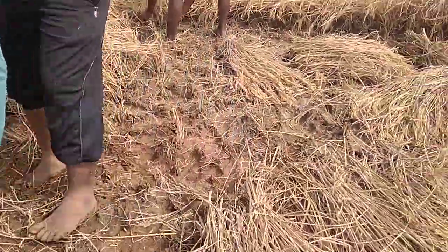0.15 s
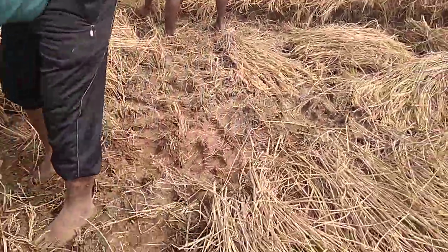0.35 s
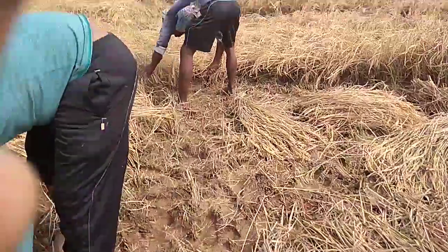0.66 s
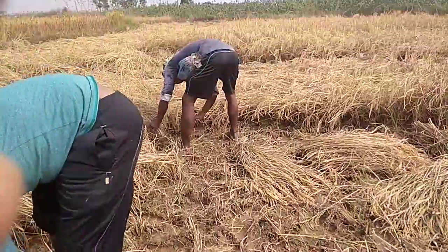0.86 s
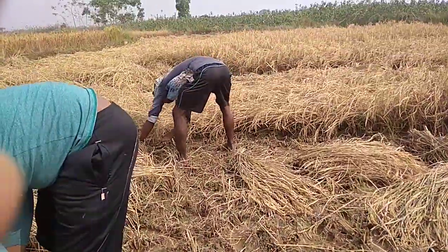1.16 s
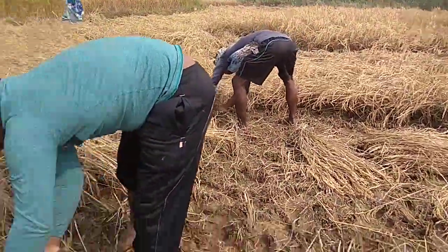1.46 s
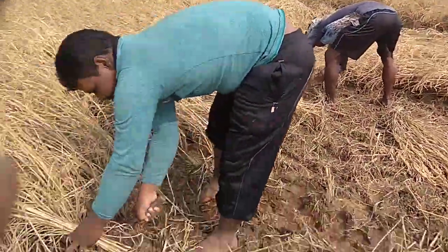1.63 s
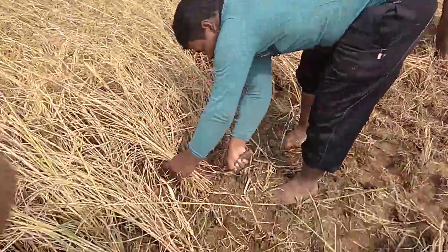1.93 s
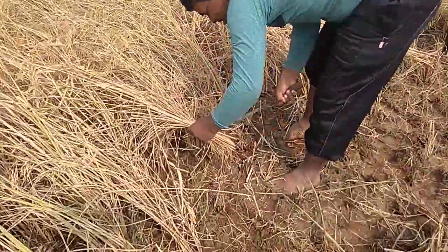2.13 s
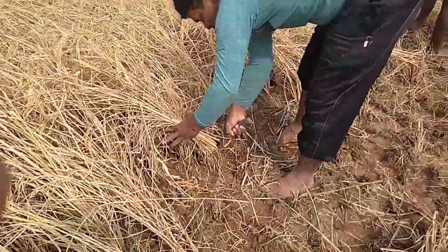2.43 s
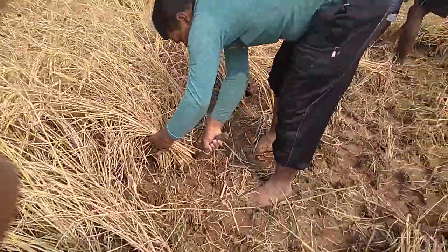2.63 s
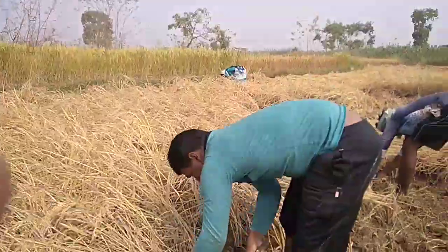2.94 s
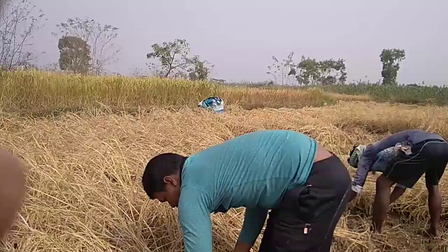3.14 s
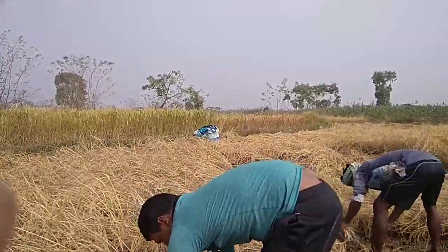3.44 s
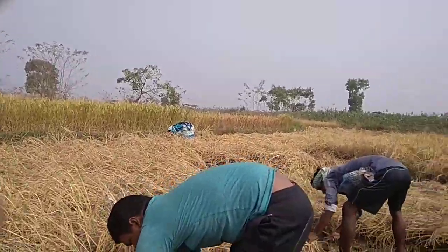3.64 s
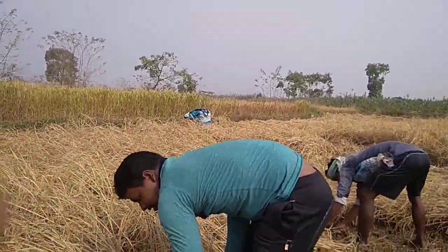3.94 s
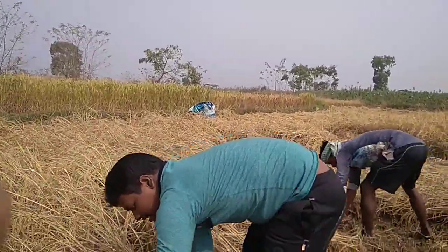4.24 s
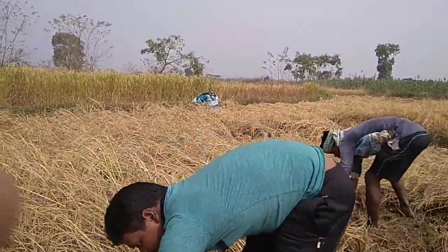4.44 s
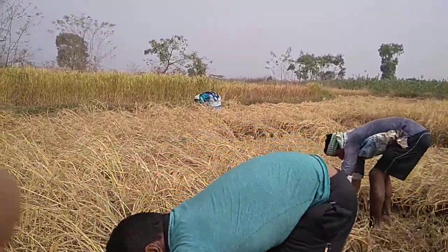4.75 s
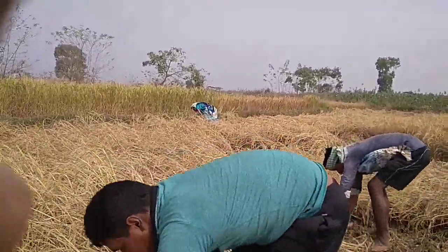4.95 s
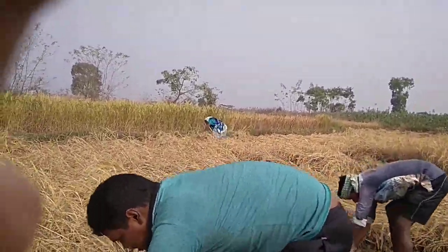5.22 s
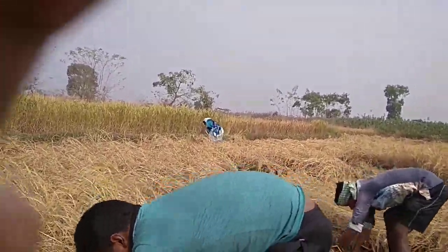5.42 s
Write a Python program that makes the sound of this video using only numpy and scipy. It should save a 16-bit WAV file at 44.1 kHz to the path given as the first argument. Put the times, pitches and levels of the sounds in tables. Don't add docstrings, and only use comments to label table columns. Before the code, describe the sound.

Close rustling and sharp snapping of dry crop stalks outdoors, with dull soil thuds, a faint bird whistle and later buffeting wind.

```python
import sys
import numpy as np
from scipy import signal
from scipy.fft import rfft, irfft, next_fast_len
from scipy.io import wavfile
from scipy.ndimage import uniform_filter1d, map_coordinates

SR = 44100
rng = np.random.default_rng(int(sys.argv[2]) if len(sys.argv) > 2 else 0)


def dump_mix(stems):
    frames = np.atleast_2d(stems).T
    limited = np.clip(frames, -1, 1)
    pcm = np.round(limited * 32767).astype(np.int16)
    wavfile.write(sys.argv[1], SR, pcm)


def how_loud(loudness_db):
    steps = np.asarray(loudness_db, float) / 20
    return 10 ** steps


N = 246078

# (frequency [Hz], left level [dB], right level [dB])
LEAF_COLOUR = [(4360, -15.5, -23.5), (6320, -16.5, -4), (7000, -7, -1.5), (8670, -0.5, -1.5),
               (9100, -1.5, 2), (10870, 0, -0.5), (13900, -3, -3.5), (15640, -4.5, -17)]
# (frequency [Hz], left level [dB], right level [dB])
STALK_COLOUR = [(1500, -30, -20), (2100, -11, -3), (2700, -5, -2), (3300, 0, 0), (4000, -6, -1),
                (5000, -10, -1), (6300, -8, -8), (7400, -40, -40)]
# (frequency [Hz], left level [dB], right level [dB])
BUNDLE_COLOUR = [(111, -39, -30), (197, 3.5, 5), (400, 3.5, 8.5), (867, -2, -2), (1095, -1.5, 1),
                 (1670, 4, 9.5), (2434, -2.5, -8), (3560, -15.5, -14)]

BLOCK = 32


def curves(rows):
    s, *cols = np.transpose(rows)
    return [np.interp(np.arange(N) / SR, s, c) for c in cols]


def unit(x):
    return x / np.sqrt(np.mean(x ** 2, axis=-1, keepdims=True) + 1e-20)


def wobble(rate):
    knots = rng.standard_normal(int(N * rate / SR) + 4)
    return map_coordinates(knots, [np.arange(N) * rate / SR])


def coloured(x, rows):
    m = next_fast_len(N + 8192)
    hz, *db = np.transpose(rows)
    grid = np.log(np.fft.rfftfreq(m, 1 / SR) + 1)
    gain = [how_loud(np.interp(grid, np.log(hz + 1), d, left=-120, right=-120)) for d in db]
    return irfft(rfft(x, m) * gain, m)[:, :N]


def noise(alike, patchy_db):
    z = signal.stft(rng.standard_normal((2, N + 512)), nperseg=512)[2]
    field = uniform_filter1d(rng.standard_normal(z.shape), size=12, axis=1)
    field = uniform_filter1d(field, size=10, axis=2)
    patchy = z * how_loud(patchy_db * field / field.std())
    a, b = signal.istft(patchy, nperseg=512)[1][:, :N]
    alike = np.clip(alike, 0, 1)
    return np.array([a, alike * a + np.sqrt(1 - alike ** 2) * b])


def ticks(rate, spread_db, life, smooth):
    draws = rng.random((4000, 2))
    waits = -np.log(1 - draws[:, 0])
    at = (np.cumsum(waits) * SR / rate).astype(int)
    size = np.minimum(-np.log(1 - draws[:, 1]), 3.5)
    inside = at < N
    power = np.bincount(at[inside], how_loud(2 * spread_db * size[inside]), N)
    power = signal.lfilter([1], [1, -np.exp(-2 / (life * SR))], power)
    return np.sqrt(smooth + power / power.mean())


def panned(db, pan_db):
    left = 2 * how_loud(db) / np.sqrt(1 + how_loud(-2 * pan_db))
    return np.array([left, left * how_loud(-pan_db)])


def add(out, pushes, length, skew, edge):
    for s, db, hz in pushes:
        centre = round(s * SR)
        at = np.arange(max(centre - 900, 0), min(centre + 900, N))
        turns = (at / SR - s) * hz
        shape = np.cos(2 * np.pi * turns + skew) + edge * np.exp(-(turns / 0.14) ** 2)
        out[at] -= how_loud(db) * np.exp(-(turns / length) ** 2) * shape


def humps(s, db, half_s):
    t = np.arange(0, N, BLOCK) / SR
    distance = np.abs((t - s[:, None]) / half_s[:, None])
    return how_loud(2 * (db[:, None] - 10 * distance ** 1.3))


def level_db(power):
    return np.repeat(10 * np.log10(power + 1e-12), BLOCK)[:N]


def mixed(rows, rest_db, rest_pan_db):
    s, db, half_s, pan_db = np.transpose(rows)
    power = humps(s, db, half_s)
    rest = how_loud(2 * rest_db)
    total = power.sum(0) + rest
    lean_db = (pan_db @ power + rest_pan_db * rest) / total
    return level_db(total), np.repeat(lean_db, BLOCK)[:N]


def bird():
    # (time [s], pitch [Hz], level [dB])
    whistles = [
        [(.77, 2080, -82), (.8, 2150, -60), (.852, 2390, -53), (.9, 2780, -49.5), (.94, 3020, -48.5),
         (.98, 2980, -70)],
        [(1.17, 1480, -85), (1.19, 1530, -58), (1.22, 1650, -55), (1.27, 1660, -61), (1.32, 1670, -86.5)],
    ]
    out = np.zeros(N)
    for whistle in whistles:
        hz, db = curves(whistle)
        strength = how_loud(db - 6.5) * (1.3 + wobble(260))
        phase = 2 * np.pi * np.cumsum(hz * (1 + .022 * wobble(130))) / SR
        out += strength * np.sin(phase)
    return out * how_loud([[-.6], [.6]])


def wind():
    # (time [s], peak level [dB], half length [s], left-right lean [dB])
    gusts = [(.03, -50.5, 0.098, 8), (.55, -56, 0.1, 7), (1.9, -56.5, 0.28, 1), (2.3, -53, 0.1, 2),
             (2.6, -50.5, 0.22, -11), (2.97, -43, 0.066, 2.5), (3.24, -44.5, 0.21, 0),
             (3.66, -44, 0.12, 1.5), (3.78, -33.5, .08, -3), (3.93, -25.5, 0.19, 6.5), (4.1, -32, 0.1, -1),
             (4.36, -37.5, 0.14, -14.5), (4.57, -36.5, 0.07, 6), (4.64, -33.5, 0.073, -9),
             (4.78, -44.5, 0.12, -3), (4.98, -36, 0.098, -3), (5.15, -45, 0.11, -8),
             (5.32, -40.5, 0.11, -11.5), (5.54, -41.5, 0.067, 4)]
    # (frequency [Hz], left level [dB], right level [dB])
    buffet_colour = [(15.3, -19, -11), (45, 1, 5.5), (111.5, 1.5, 4.5), (189, -12.5, -12),
                     (291, -21.5, -35.5), (600, -39.5, -42), (1180, -91, -72.5)]
    # (frequency [Hz], left level [dB], right level [dB])
    flutter_colour = [(90, -23, -42), (163, -7, 0.5), (270, 4.5, 13.5), (400, -12, -13), (710, -38, -35)]
    # (time [s], peak level [dB])
    left_eddies = [(3.204, -27), (3.3, -22.5), (3.35, -20.5), (3.613, -27), (3.734, -12.5), (3.762, -19),
                   (3.955, -18.5), (3.978, -27), (4.018, -12), (4.051, -14), (4.11, -21.5), (4.147, -23),
                   (4.453, -26.5), (4.47, -44), (4.548, -17), (4.569, -18), (4.744, -29), (4.938, -27.5),
                   (5.0, -27.5), (5.063, -23.5), (5.53, -38), (5.555, -19.5)]
    # (time [s], peak level [dB])
    right_eddies = [(0.042, -35.5), (0.95, -39.5), (1.49, -31.5), (2.149, -38), (2.272, -43), (2.512, -42),
                    (2.633, -32.5), (2.899, -38), (3.211, -36), (3.46, -32), (3.746, -21), (3.823, -13.5),
                    (4.027, -20), (4.07, -26), (4.199, -24.5), (4.612, -19), (4.636, -13.5), (4.666, -14),
                    (4.95, -32), (5.088, -30), (5.14, -29.5), (5.576, -32)]
    # (time [s],
    # peak level [dB], frequency [Hz])
    left_creaks = [(0.146, -44.5, 600), (1.6407, -37.5, 600), (1.65, -38, 1010), (2.994, -15, 1380),
                   (3.3455, -14.5, 643), (3.3537, -17, 896), (3.3643, -33.5, 510), (3.373, -29.5, 965),
                   (3.9504, -27, 406), (3.956, -10, 250), (4.554, -40.5, 327), (5.206, -39, 420),
                   (5.214, -38, 420), (5.224, -39, 400), (5.25, -38, 326)]
    # (time [s], peak level [dB], frequency [Hz])
    right_creaks = [
        (3.968, -31, 420),
        (4.03, -37, 328),
        (4.636, -20.5, 389),
    ]

    lumps = how_loud(3.5 * np.array([wobble(30), wobble(30)]))
    strength_db, pan_db = mixed(gusts, rest_db=-59, rest_pan_db=4.0)
    buffet = unit(coloured(lumps * noise(alike=0, patchy_db=1.0), buffet_colour))
    out = panned(strength_db - .7, pan_db) * buffet
    swirl = unit(coloured(lumps ** 1.36 * noise(alike=0, patchy_db=6.0), flutter_colour))
    swirl_db = -42 + 1.66 * (strength_db + 29.5)
    out += panned(swirl_db, pan_db) * swirl

    def with_pitch(eddies):
        return [(s, db, 107.6 + 3 * (db + 25)) for s, db in eddies]

    add(out[0], with_pitch(left_eddies), length=0.43, skew=1.2, edge=0.025)
    add(out[1], with_pitch(right_eddies), length=.5, skew=.6, edge=.3)
    add(out[0], left_creaks, length=0.62, skew=0.058, edge=0)
    add(out[1], right_creaks, length=0.61, skew=0.3, edge=0)
    return out


def thuds():
    # (time [s], peak level at the left port [dB], frequency [Hz])
    soil_hits = [(0.141, -32.5, 263), (0.173, -38, 285), (0.392, -35.5, 215), (0.536, -34.5, 262),
                 (0.552, -32.5, 232), (0.574, -32, 340), (1.037, -36, 370), (1.065, -31.5, 290),
                 (1.087, -28.5, 393), (1.114, -25, 370), (1.642, -29.5, 232), (2, -34.5, 332),
                 (2.033, -29.5, 400), (2.066, -26, 395), (2.087, -23.5, 381), (2.801, -40.5, 193),
                 (2.963, -26.5, 353), (2.987, -21.5, 393)]
    # (frequency [Hz], left level [dB], right level [dB])
    earth_colour = [(134, -32, -39), (233, -3, -3), (456, -1.5, -5.5), (800, -14.5, -16),
                    (1460, -27.5, -30)]
    pushes = np.zeros(N)
    add(pushes, soil_hits, length=0.49, skew=1.5, edge=0.046)
    s, db, _ = np.transpose(soil_hits)
    puff_half_s = np.full(len(s), .016)
    puffs = how_loud(level_db(humps(s, db - 12.5, puff_half_s).sum(0)))
    earth = coloured(noise(alike=.7, patchy_db=1.0), earth_colour) * how_loud(14)
    return pushes * how_loud([[-3], [-11.5]]) + puffs * earth


def hands():
    # (time [s], leaf hiss peak level [dB], half length [s], left-right lean [dB])
    handfuls = [(0.113, -48.5, 0.19, 5.5), (0.324, -44.5, 0.11, 7), (0.574, -30, .1, 13.5),
                (0.758, -38.5, .02, 20.5), (0.954, -37.5, 0.14, 16), (1.044, -31.5, 0.038, 7.5),
                (1.13, -28.5, 0.093, 15.5), (1.265, -39, 0.21, 16), (1.536, -32, 0.25, 14.5),
                (1.812, -33, 0.087, 8.5), (1.926, -35, .1, 7), (2.082, -30.5, 0.085, 4.5),
                (2.226, -34, 0.11, 8.5), (2.575, -34, 0.44, 5.5), (2.798, -37.5, 0.18, 2.5),
                (2.986, -29.5, 0.049, 5), (3.243, -35, 0.34, 6.5), (3.404, -46, 0.16, 20),
                (3.575, -37.5, 0.34, 8), (3.75, -39, 0.06, 4), (3.979, -32.5, 0.22, 6.5),
                (4.152, -32.5, 0.29, 13), (4.436, -29.5, 0.26, 13), (4.7, -32, 0.3, 5.5),
                (4.95, -29, 0.11, 11), (5.1, -32.5, 0.32, 11), (5.413, -34.5, 0.75, 14),
                (5.57, -33.5, 0.17, 6)]
    return mixed(handfuls, rest_db=-57, rest_pan_db=7.5)


def snaps():
    # (time [s], crack peak level [dB], hollow body level relative to the crack [dB])
    breaks = [(0.463, -18, -23), (0.5332, -12, -16), (0.5824, -18.5, -0.5), (0.7582, -11.5, -17.5),
              (0.9478, -20, -15), (1.047, -5, -21.5), (1.0871, -7.5, -10), (1.0904, -4.5, -15.5),
              (1.093, -10, -4.5), (1.1192, -4, -10.5), (1.1229, -10, -13), (1.918, -11, -14),
              (1.9604, -19.5, -16), (2.0127, -12.5, -7.5), (2.0603, -8.5, -5.5), (2.0714, -13.5, -9),
              (2.0941, -7, -8), (2.0972, -9.5, -9.5), (2.173, -12.5, -12.5), (2.2944, -12, -28.5),
              (2.947, -19, -4.5), (2.994, -13.5, -5.5), (3.352, -11, -11), (3.754, -13, -21),
              (3.8532, -16, -1), (3.8781, -19, 2), (4.5948, -10, -15.5), (4.709, -11.5, -14),
              (4.9329, -6.5, -4.5), (4.9592, -3.5, -6.5)]
    knock_db = -13.5
    clicks, tails = np.zeros((3, N)), np.zeros((3, N + SR))
    t = np.arange(SR // 50) / SR
    decay = np.exp(-t / .0008) + 0.27 * np.exp(-t / 0.0055)
    for s, db, body_db in breaks:
        size = how_loud(db + np.array([0, body_db, body_db + knock_db]))
        start = round(s * SR)
        clicks[:, start + 6] = size
        tails[:, start:start + len(t)] += size[:, None] * decay
    ragged = [rng.standard_normal((count, N)) for count in (2, 2, 1)]
    crack, rattle, knock = (.85 * c + .5 * e[:N] * r for c, e, r in zip(clicks, tails, ragged))
    _, pan_db = hands()
    leaves = panned(-2.2, pan_db) * coloured(crack, LEAF_COLOUR)
    stalks = how_loud([[13], [1.5]]) * coloured(rattle, STALK_COLOUR)
    bundle = how_loud([[12], [6]]) * coloured(knock, BUNDLE_COLOUR)
    return leaves + stalks + bundle


def straw():
    # (time [s], half length [s], stalk rattle level [dB], bundle crunch level [dB])
    strokes = [(0.562, 0.042, -46, -53.5), (0.586, 0.015, -35.5, -48), (1.061, 0.026, -46, -50.5),
               (1.092, 0.013, -36.5, -42.5), (1.12, 0.015, -37, -43.5), (2.077, 0.027, -43.5, -48),
               (2.975, 0.038, -41, -46), (3.356, 0.015, -43, -43.5), (3.856, 0.045, -42, -50.5),
               (4.944, 0.041, -37, -43), (5.58, 0.048, -57, -50)]
    hiss_db, pan_db = hands()
    s, half_s, cut_rattle_db, cut_crunch_db = np.transpose(strokes)

    def stirred_and_cut(db, shade, cut_db):
        stirred = how_loud(2 * (db + .8 * (hiss_db + 37) - shade * pan_db))
        cut = how_loud(2 * level_db(humps(s, cut_db, half_s).sum(0)))
        return 10 * np.log10(stirred + cut)

    rattle_db = stirred_and_cut(-47, .3, cut_rattle_db)
    crunch_db = stirred_and_cut(-57.5, 0.51, cut_crunch_db)
    fine = ticks(rate=670, spread_db=6.0, life=0.0014, smooth=5.4) * how_loud(0.21 * wobble(25.13))
    coarse = ticks(rate=120, spread_db=1.5, life=0.0032, smooth=2.7)
    leaves = unit(coloured(fine * noise(alike=0, patchy_db=1.5), LEAF_COLOUR))
    stalks = unit(coloured(fine * np.sqrt(coarse) * noise(alike=0.25, patchy_db=1.0), STALK_COLOUR))
    bundle = unit(coloured(coarse * noise(alike=.75, patchy_db=1.0), BUNDLE_COLOUR))
    hiss = panned(hiss_db, pan_db) * leaves
    rattle = panned(rattle_db, 0.26 * pan_db + 8.0) * stalks
    crunch = panned(crunch_db, .3 * pan_db + 4.5) * bundle
    return hiss + rattle + crunch


def scene():
    near = thuds() + snaps() + straw()
    near[0] = np.roll(near[0], 4)
    return bird() + wind() + near


def roll_off(x):
    return signal.sosfilt(signal.butter(12, 15990, fs=SR, output="sos"), x)


def record(dry):
    return roll_off(dry)


dry = scene()
out = record(dry)
dump_mix(out)
```